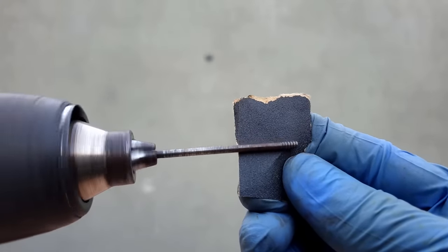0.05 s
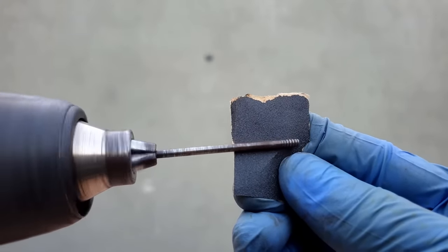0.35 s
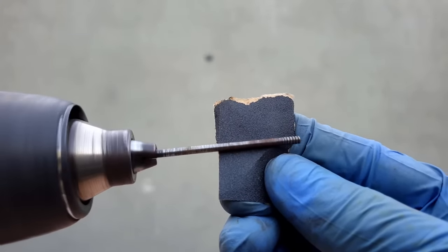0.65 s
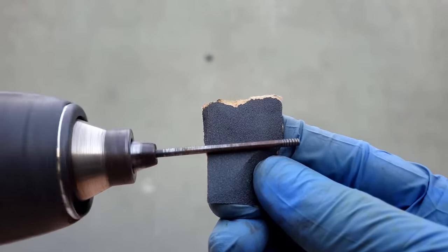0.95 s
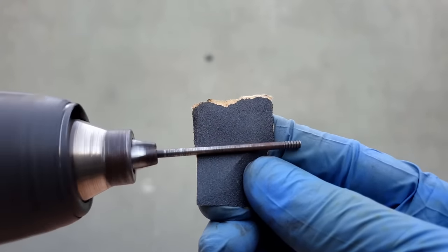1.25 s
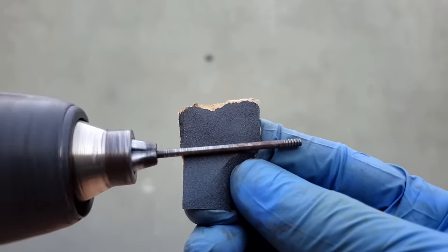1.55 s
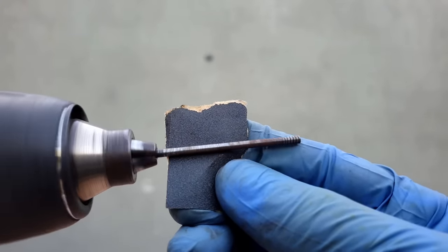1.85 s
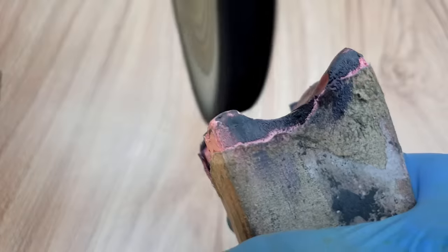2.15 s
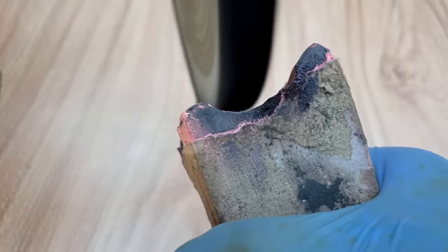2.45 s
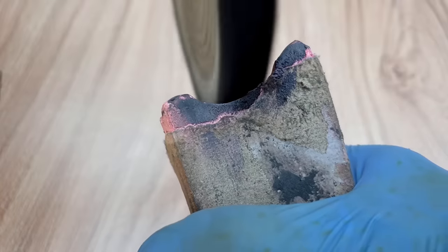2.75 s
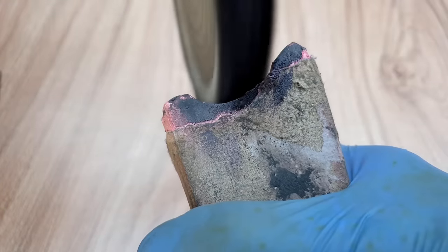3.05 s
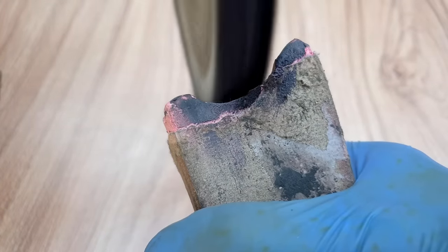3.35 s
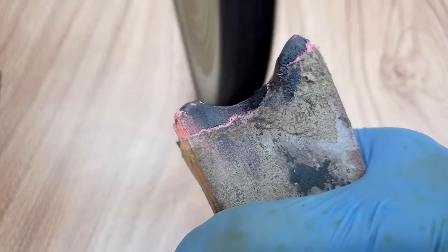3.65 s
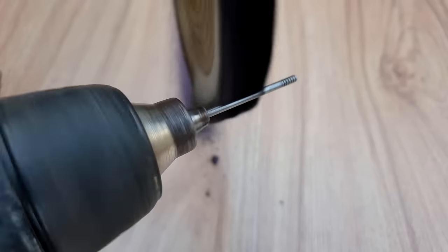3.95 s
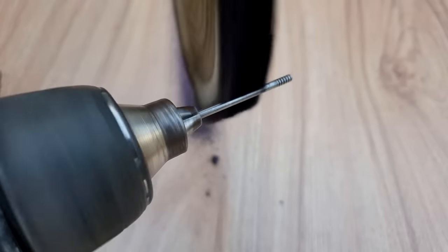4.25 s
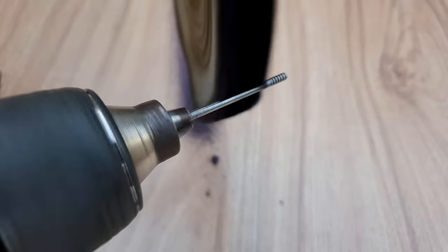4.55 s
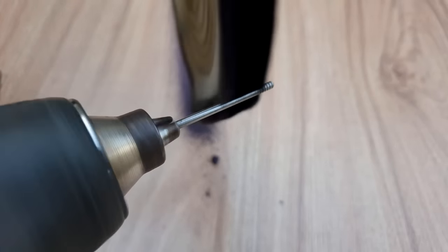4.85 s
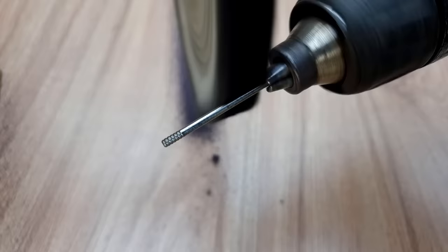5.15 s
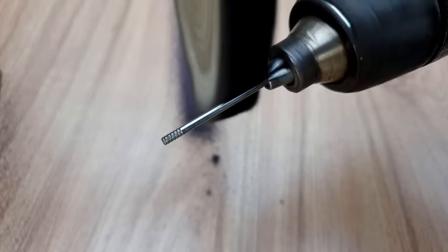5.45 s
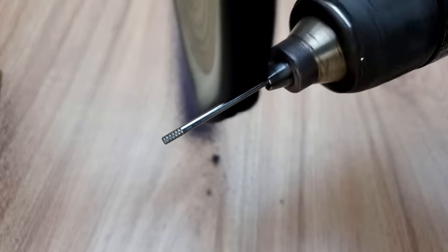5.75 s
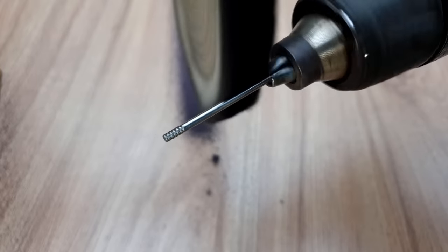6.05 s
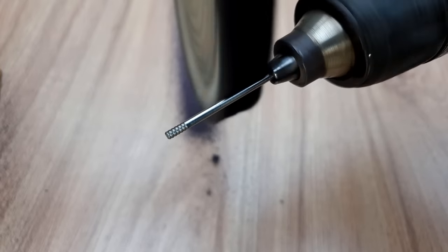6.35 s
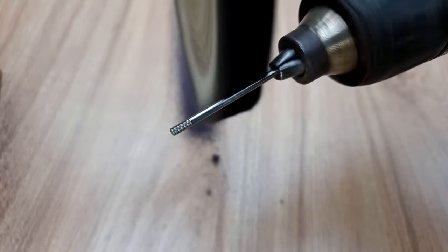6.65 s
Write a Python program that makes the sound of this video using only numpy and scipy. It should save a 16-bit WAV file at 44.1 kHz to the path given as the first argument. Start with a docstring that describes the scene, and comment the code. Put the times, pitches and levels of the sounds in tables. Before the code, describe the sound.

A whining drill spins a steel rod against sandpaper, a block rasps softly on an abrasive wheel, then the rod grinds with a loud hiss.

```python
"""Workshop, close up: four quick jobs. A whining drill spins a thin steel rod against sandpaper.
A block is eased onto a motor-driven abrasive wheel: it grazes, rasps, and ticks as a high spot
strikes it once a turn, among faint bird-like chirps. Then the rod hisses loudly on the wheel: first
its shank, with the drill whining, then its tip, fluttering. Grit excites each piece's resonances.
Motor hum and room noise lie underneath."""
import sys
import numpy as np
from scipy import signal
from scipy.fft import rfft, irfft, next_fast_len
from scipy.io import wavfile
from scipy.ndimage import uniform_filter1d

SR = 44100
rng = np.random.default_rng(int(sys.argv[2]) if len(sys.argv) > 2 else 0)


def persist_wave(psi):
    """Save psi, clipped to +-1, as 16-bit WAV."""
    counts = np.round(np.clip(psi, -1, 1) * 32767).astype(np.int16)
    wavfile.write(sys.argv[1], SR, np.atleast_2d(counts).T)


N = 295457
T = np.arange(N) / SR
FFT_SIZE = next_fast_len(N, True)
HZ = np.fft.rfftfreq(FFT_SIZE, 1 / SR)

# jobs (start [s], end [s])
SANDING_S, BLOCK_S, SHANK_S, TIP_S = (-.1, 2.157), (2.158, 3.74), (3.74, 5.209), (5.211, 6.8)
# (time [s], wheel speed [turns/s])
WHEEL_SPEED = [(2.2, 49.6), (2.8, 49.45), (3.3, 48.9), (3.9, 48.8), (4.8, 48.65), (5.15, 48.7), (5.4, 49.2),
               (6.2, 49.35)]
# drill whine (motor order, relative level [dB])
WHINE_SANDING = [(1, -20.5), (3, -20), (6, -18), (9, 2.5), (12, -16), (15, -1), (16, -13), (17, -15),
                 (22, -10), (23, -10), (24, -3), (25, -7.5), (26, -6.5), (27, -11), (29, -12), (30, -7),
                 (32, -15), (33, -12), (35, -8.5), (36, -14)]
WHINE_SHANK = [(1, -33), (3, -24), (9, 0), (12, -1.5), (15, -5.5), (16, -11), (17, -11), (24, -9), (25, -9),
               (27, -8), (29, -13), (32, -12), (35, -12)]
# contact spectra (frequency [Hz], relative density [dB])
COLOUR_SANDING = [(200, -35), (380, -19), (560, -52), (900, -30), (1020, -78), (1280, -24.5), (1920, -24),
                  (2140, -21.5), (2540, -8.5), (3400, -5.5), (3770, -9), (4100, -5), (5890, -5),
                  (6720, 1.5), (7860, -10), (10800, -4.5), (12300, -8.5), (16000, -10)]
COLOUR_BLOCK = [(350, -54), (600, -25), (881, -16), (957, -11.5), (1140, -10.5), (2150, -3), (2720, 2.5),
                (3120, -4.5), (3430, -1.5), (4460, -6), (4840, -5), (6120, 2), (6920, -12.5), (11300, -5),
                (16000, -11.5)]
COLOUR_SHANK = [(410, -42), (700, -38), (1500, -14.5), (1600, -12), (1850, -9), (2110, 1), (2730, -8),
                (3790, -9), (4150, -4.5), (5060, -6), (5690, -2.5), (6740, -3), (9110, -4), (15200, -2.5),
                (16000, -5)]
COLOUR_TIP = [(410, -77), (700, -39), (1540, -17), (2190, -2.5), (2660, -12.5), (2900, -4.5), (3250, -7),
              (3500, -1), (3940, -3.5), (5190, -2.5), (6150, -8), (6830, -1), (9600, -2.5), (12000, -0.5),
              (13500, -4), (14800, -0.5), (16000, -3)]
# resonances and notches of the held piece (frequency [Hz], width [Hz], gain [dB])
RINGS_SANDING = [(1183, 250, 15.5), (2230, 250, 9), (4650, 710, 1.5), (6800, 320, -3.5), (10200, 1100, -2)]
RINGS_BLOCK = [(1010, 210, 10), (2260, 65, 8), (2680, 80, -1), (2930, 200, -7), (3510, 130, 9),
               (4060, 110, 9), (4350, 190, 12.5), (4650, 150, -4.5), (5700, 58, 2), (6960, 440, 13)]
RINGS_BLOCK_TILTED = [(955, 75, -2), (1340, 160, 6), (1870, 120, 10), (2000, 110, -2), (2125, 60, 3),
                      (2500, 140, 0.5), (3190, 130, -7), (3520, 130, 4), (3734, 40, 4), (4140, 100, 6.5),
                      (4500, 110, 1), (5400, 280, 4), (7160, 820, 8.5)]
RINGS_SHANK = [(1623, 21, 15.5), (2150, 160, 2.2), (3530, 170, 12), (5030, 240, 3.8), (6740, 130, 6.4),
               (11300, 180, 2.1)]
RINGS_TIP = [(1880, 86, 5), (2200, 500, 3.5), (3550, 160, 6.5), (4730, 80, -2), (4840, 200, 4.5),
             (5400, 110, 3), (6080, 83, 11), (6760, 221.4, 2.5), (7500, 220, -4), (8080, 66.15, 8),
             (8570, 150, 2), (11800, 260, 1), (12050, 250, 8), (14400, 350, 6.5), (15000, 400, 6)]
# wheel-kicked modes (frequency [Hz], level [dB], peak position [turns], half length [s], glide [Hz/ms])
MODES_BLOCK = [(1006, -70.5, 0.8, 0.0027, -15), (1570, -67.5, .24, 0.004, 105), (2160, -66, .05, 0.002, 5),
               (4430, -63, .17, 0.0021, 30)]
MODES_SHANK = [(2102, -46, .05, 0.0046, -21), (3520, -52, 0.34, 0.0036, -31), (5020, -52.5, .47, 0.003, -3),
               (6940, -65, .3, .0018, 37)]
MODES_TIP = [(1970, -58.5, .62, 0.0027, 122), (2210, -56.5, .28, .0013, 0), (3496, -47.5, .21, .0036, -10),
             (5340, -53.5, .28, .0018, 60), (6740, -50.5, 0.343, 0.0023, -2), (7130, -51.5, .1, .0028, -55)]
# hand pressure on the paper (time [s], relative level [dB])
PRESS_SANDING = [(.02, -38.5), (.07, -42.5), (.11, -40), (.36, -40), (.4, -36.5), (.45, -40)]
# coarse grains snapping (time [s], treble boost [dB])
GRAIN_SNAPS = [(.262, 12), (.299, 10), (.388, 12)]
# pressure on the block (time [s], hiss level [dB])
PRESS_BLOCK = [(2.33, -80), (2.56, -61), (2.69, -54.5), (2.73, -50), (3.04, -48.5), (3.22, -44.5),
               (3.45, -49.5), (3.69, -51), (3.74, -44.5)]
# high spot catching the block (time [s], peak force [dB])
CATCHES = [(3.066, -30.5), (3.1476, -25.5), (3.228, -32), (3.297, -22)]
# struck block (frequency [Hz], relative level [dB])
TICK_MODES = [(5500, -0.5), (6350, 2), (10000, -2.5), (12800, -9)]
# edge scrapes (peak time [s], half length [s], frequency [Hz], glide [Hz/s], width [Hz], level [dB])
SCRAPES = [(2.254, .04, 3120, -1500, 450, -71), (2.387, 0.03, 3080, -6000, 300, -61.5),
           (2.412, 0.049, 2410, 0, 800, -62.5), (2.408, 0.041, 5440, -3000, 900, -59.5),
           (2.488, .055, 5430, 0, 220, -69), (2.555, 0.028, 4750, -3000, 900, -69),
           (2.63, .04, 5850, 2000, 600, -67), (2.637, 0.069, 2750, 3500, 400, -66),
           (2.756, 0.048, 2090, 600, 300, -56), (2.946, 0.14, 2750, -200, 110, -58),
           (2.99, .05, 2370, 0, 200, -56), (3.125, 0.049, 4320, -8000, 200, -53),
           (3.26, 0.081, 2370, 600, 450, -55.5), (3.65, .015, 4350, -17000, 300, -60)]
# (start [s], length [s], first pitch [Hz], last pitch [Hz], hoarseness [0-1], level [dB])
CHIRPS = [(2.148, 0.12, 2185, 1940, 0.06, -60.5), (2.155, .026, 3550, 2900, 0.1, -65),
          (2.305, 0.026, 3400, 2930, .03, -73), (2.432, .12, 2410, 2286, 0.05, -58.5)]
# wheel motor: light, under the block, under the rod (start [s], end [s], levels of 4 orders [dB])
MOTOR_HUM = [(2.16, 3.0, -79, -68.5, -81.5, -94), (3.017, 3.75, -88, -75, -73, -83.5),
             (3.738, 6.8, -96, -87.5, -85, -109)]
# background spectra (frequency [Hz], relative density [dB])
COLOUR_BENCH = [(30, -28), (60, 10), (140, 5), (250, 1.5), (500, -45), (1500, -52)]
COLOUR_ROOM = [(15, -12), (30, -4), (55, 1), (100, -2.5), (150, -2.5), (300, -4), (400, -5.5), (520, -2),
               (750, -6.5), (1100, -31), (2000, -16)]
# stereo width (frequency [Hz], side minus mid [dB])
WIDTH_SANDING = [(60, -2), (130, -4), (290, -28), (640, 12), (1410, 3), (3100, -3), (6820, -2), (15000, -4)]
WIDTH_BLOCK = [(60, -5), (130, -3.5), (290, -4), (640, -5), (1410, -0.5), (3100, 2), (6820, -4),
               (15000, -6.5)]
WIDTH_SHANK = [(400, -1), (1300, 11.5), (2050, -8.5), (2600, 4), (4000, 1), (6200, 1), (7300, -7),
               (8200, -64), (13000, -12), (16000, -34)]
WIDTH_TIP = [(400, -12), (1400, 2), (2200, -1), (3500, -1), (3950, 11), (4700, -3), (7300, -1), (7900, -15),
             (16000, -96)]
WIDTH_ROOM = [(30, -1), (120, -4), (300, -7.5), (600, -3)]
# (frequency [Hz], left minus right [dB])
BALANCE_SANDING = [(300, 3), (1300, 6.5), (2700, 5), (6500, 6.5), (9000, -1.5), (12500, 4.5), (15000, 10)]


def rod_shank(rub_db=-32.5, drill_db=-41, drill_hz=435.4):
    """The spinning rod meets the wheel close to the chuck and rings near 2 kHz."""
    force = wheel_grit(repeat_hz=3050, patchy_db=.5, repeat_share=.42) * amp(.8 * drift(38))
    rub = unit(shape(force, body(COLOUR_SHANK, RINGS_SHANK)))
    rub *= amp(rub_db + runout_db(once_db=.56, twice_db=-.7, offset_turns=.39))
    chatter = kicks(MODES_SHANK, SHANK_S, slip_rad=.5, uneven_db=2.2)
    whine = drill_whine(drill_speed(drill_hz), SHANK_S, WHINE_SHANK, jitter=.0008, flutter=.5, waver_db=.6)
    rod = stereo(rub + chatter, WIDTH_SHANK, left_db=.9, direct=.94)
    drill = stereo(amp(drill_db) * whine, WIDTH_SHANK, left_db=3.5)
    return (rod + drill) * during(SHANK_S)


def rod_tip(rub_db=-33, wobble_hz=6.35, settle_s=.01):
    """Near its free end the rod wobbles slowly and bounces with each wheel turn."""
    wobble_db = .13 * np.cos(2 * np.pi * wobble_hz * T) + .21 * drift(30)
    force = wheel_grit(repeat_hz=2779, patchy_db=.5, repeat_share=.51)
    force *= amp(wobble_db + runout_db(once_db=.06, twice_db=1.5, offset_turns=.35))
    landing_db = -4 * np.exp(-abs(T - TIP_S[0]) / settle_s)
    rub = unit(shape(force, body(COLOUR_TIP, RINGS_TIP))) * amp(rub_db + landing_db)
    chatter = kicks(MODES_TIP, TIP_S, slip_rad=.7, uneven_db=1.2)
    return stereo(rub + chatter, WIDTH_TIP, left_db=-.74) * during(TIP_S)


def sanding(rub_db=-41.5, drill_db=-40.5, drill_hz=432, snap_s=.0005, let_go_s=.017):
    """The rod rubs sandpaper, shaken by motor and chuck; the whine slowly grows."""
    speed_hz = drill_speed(drill_hz)
    angle = 2 * np.pi * np.cumsum(speed_hz) / SR
    motor_db = 1.4 * np.cos(angle) + .68 * np.cos(2 * angle)
    chuck_db = .6 * np.cos(angle / 19)
    grit_db = drift(520)
    force = rng.standard_normal((2, N)) * amp(motor_db + chuck_db + grit_db)
    rub = unit(shape(force, body(COLOUR_SANDING, RINGS_SANDING)))
    treble = shape(rub, 1 / (1 + (7500 / (HZ + 1)) ** 8))
    snap_db = sum(db * np.exp(-abs(T - at_s) / snap_s) for at_s, db in GRAIN_SNAPS)
    rub = (rub - treble) * amp(.5 * drift(40)) + treble * amp(1.2 * drift(28) + snap_db)
    press_db = curve(PRESS_SANDING) - np.mean(PRESS_SANDING, axis=0)[1]
    rub *= amp(rub_db + press_db)
    growth_db = 1.05 * np.minimum(T - SANDING_S[1], 0)
    whine = drill_whine(speed_hz, SANDING_S, WHINE_SANDING, jitter=.0007, flutter=.6, waver_db=.7)
    rod = stereo(rub, WIDTH_SANDING, left_db=spectrum_db(BALANCE_SANDING), direct=.9)
    drill = stereo(amp(drill_db + growth_db) * whine, WIDTH_SANDING, left_db=5.5)
    let_go_db = -9 * np.clip(1 + (T - SANDING_S[1]) / let_go_s, 0, 1)
    return (rod + drill) * amp(let_go_db) * during(SANDING_S, edge_samples=450)


def block(bite_db=-50.5, free_rasp_db=-70.5, full_rasp_db=-55, tilt_at_s=3.06, tilt_length_s=.13):
    """Pressure drives grit hiss and, as the wheel bites, a buzzing rasp; tilting shifts the resonances."""
    held_db = curve(PRESS_BLOCK)
    graze_db = -54.5 + swell_db(at_s=2.385, hold_s=.039, rise_db_per_s=380, fall_db_per_s=168)
    press_db = np.maximum(held_db, graze_db)
    seated = amp(3.7 * np.minimum(held_db - bite_db, 0))  # steep rise, capped at the bite
    tilt = np.clip(.5 + (T - tilt_at_s) / tilt_length_s, 0, 1)
    force = wheel_grit(repeat_hz=4760, patchy_db=1.5, repeat_share=.84)
    upright = shape(force, body(COLOUR_BLOCK, RINGS_BLOCK))
    tilted = shape(force, body(COLOUR_BLOCK, RINGS_BLOCK_TILTED))
    ringing = (1 - tilt) * upright + tilt * tilted
    light_touch = shape(force, amp(spectrum_db(COLOUR_BLOCK)))
    rub = seated * ringing + (1 - seated) * light_touch
    lowpass = 1 / (1 + (HZ / 3600) ** 6)
    rasp_gain = np.hypot(amp(free_rasp_db), amp(full_rasp_db) * seated)
    rasp = unit(shape(rub, lowpass)) * rasp_gain * amp(runout_db(once_db=-1, twice_db=0))
    buzz = kicks(MODES_BLOCK, BLOCK_S, slip_rad=.18, uneven_db=3) * seated * amp(-4 * tilt)
    hiss = unit(shape(rub, 1 - lowpass))
    treble = shape(hiss, 1 - 1 / (1 + (HZ / 7200) ** 8))
    dulling_db = .088 * np.minimum(press_db - bite_db, 0)  # a light touch is duller
    hiss += treble * (amp(dulling_db) - 1)
    hiss *= amp(press_db + runout_db(once_db=.5, twice_db=.5) + 1.03 * drift(25))
    out = stereo(rasp + buzz, WIDTH_BLOCK, left_db=-3.5) + stereo(hiss, WIDTH_BLOCK, left_db=4.5)
    return out * during(BLOCK_S)


def wheel_grit(repeat_hz, patchy_db, repeat_share):
    """Coarse rim bumps return each turn; fine grit cuts afresh, harder on some patches."""
    turns, rim_points = wheel_turns(), SR // 49
    bumps = np.array([around_rim(rim, turns) for rim in rng.standard_normal((2, rim_points))])
    fresh = rng.standard_normal((2, N))
    share = repeat_share / (1 + (HZ / repeat_hz) ** 2)
    force = shape(bumps, np.sqrt(share)) + shape(fresh, np.sqrt(1 - share))
    patches = uniform_filter1d(rng.standard_normal(rim_points), size=36, mode="wrap")
    patches -= uniform_filter1d(patches, size=300, mode="wrap")
    return force * amp(patchy_db * around_rim(unit(patches), turns))


def runout_db(once_db, twice_db, offset_turns=0):
    """An off-centre, out-of-round wheel presses harder once and twice a turn."""
    angle = 2 * np.pi * (wheel_turns() - offset_turns)
    return once_db * np.cos(angle) + twice_db * np.sin(2 * angle)


def kicks(modes, span_s, slip_rad, uneven_db, stray_s=.00027):
    """Once a turn each mode swells, glides and dies; strength, timing and phase stray."""
    gate = during(span_s)
    live = gate > .001
    turns, speed_hz = wheel_turns()[live], curve(WHEEL_SPEED)[live]
    out = np.zeros((2, N))
    for hz, db, peak_turns, half_s, glide_hz_per_ms in modes:
        turn, fraction = np.divmod(turns - peak_turns + .5, 1)
        t = (fraction - .5) / speed_hz
        size, phase, late = rng.standard_normal((400, 3))[turn.astype(int)].T
        envelope = np.exp(-((t - stray_s * late) / half_s) ** 2) * amp(uneven_db * size)
        angle = 2 * np.pi * (hz + .5 * glide_hz_per_ms * t * 1000) * t + slip_rad * phase
        out[:, live] += amp(db) * unit(envelope * np.array([np.cos(angle), np.sin(angle)]))
    return out * gate


def drill_whine(speed_hz, span_s, orders, jitter, flutter, waver_db):
    """Orders of the drill's motor; the high ones flutter most."""
    live = during(span_s, edge_samples=1000) > .001
    jittered_hz = speed_hz * (1 + jitter * drift(174))
    angle = 2 * np.pi * np.cumsum(jittered_hz[live]) / SR
    knots_s = np.linspace(0, T[-1], N // 500)
    tone = np.zeros(N, complex)
    for order, db in orders:
        depth = min(flutter * (order + 12) / 48, .7)
        waver = 1 + depth * np.interp(T[live], knots_s, rng.uniform(-1, 1, len(knots_s)))
        tone[live] += amp(db) * waver * np.exp(1j * (order * angle + 2 * np.pi * rng.random()))
    return np.array([tone.real, tone.imag]) / np.std(tone.real[live]) * amp(waver_db * drift(25))


def drill_speed(hz, hunt_hz=.462):
    """Steady motor speed that hunts slightly."""
    return hz + hunt_hz * drift(6.96)


def ticks(high_spot_s=3.2905, threshold_db=-34.5, rise_s=.00037, decay_s=.00055, lag_s=.00078):
    """A high spot catches the block, then rings its damped modes once a turn, ever more weakly."""
    out = np.zeros((2, N))
    hz, mode_db = np.transpose(TICK_MODES)
    turns = wheel_turns()
    passes = np.flatnonzero(np.diff(np.floor(turns - np.interp(high_spot_s, T, turns))))
    catches_db = [db + swell_db(at_s, 0, rise_db_per_s=450, fall_db_per_s=122) for at_s, db in CATCHES]
    force_db = np.max(catches_db, axis=0)
    for at, (detune, start_cycles) in zip(passes, rng.random((len(passes), 2, 2, len(hz), 1))):
        if force_db[at] > threshold_db:
            near = abs(T - T[at]) < .01
            t = T[near] - T[at] - lag_s
            cycles = hz[:, None] * (.97 + .07 * detune) * t + start_cycles
            ring = (amp(mode_db)[:, None] * np.sin(2 * np.pi * cycles)).sum(1)
            envelope = np.exp(np.minimum(t / rise_s, -t / decay_s))
            out[:, near] += amp(force_db[at]) * envelope * ring
    return stereo(out, WIDTH_BLOCK, left_db=2.5)


def edge_scrapes():
    """The block rocks; grit feeds fuzzy edge resonances that swell, glide and fade."""
    force = wheel_grit(repeat_hz=3500, patchy_db=2, repeat_share=.65)
    out = np.zeros((2, N))
    for at_s, half_s, hz, glide_hz_per_s, width_hz, db in SCRAPES:
        near = abs(T - at_s) < 3 * half_s
        t = T[near] - at_s
        # gliding band-pass: shift down, low-pass, shift back
        carrier = np.exp(2j * np.pi * (hz + .5 * glide_hz_per_s * t) * t)
        baseband = signal.lfilter(*signal.butter(2, width_hz / SR), force[:, near] / carrier)
        ring = (carrier * baseband).real
        out[:, near] += amp(db) * np.exp(-(t / half_s) ** 2) * unit(ring)
    return stereo(out, WIDTH_BLOCK, left_db=7) * during(BLOCK_S)


def chirps(steepness=5.5):
    """Thin, slightly hoarse whistles that hold, slide down and level off."""
    out = np.zeros((2, N))
    jitter = .3 * drift(420)
    for start_s, length_s, first_hz, last_hz, hoarseness, db in CHIRPS:
        progress = np.clip((T - start_s) / length_s, 0, 1)
        slide = .5 + .5 * np.tanh(steepness * (progress - .5))
        pitch_hz = (first_hz + (last_hz - first_hz) * slide) * (1 + hoarseness * jitter)
        angle = 2 * np.pi * np.cumsum(pitch_hz) / SR
        envelope = np.sqrt(2 * abs(np.sin(np.pi * progress)))
        out += amp(db) * envelope * np.array([np.cos(angle), np.sin(angle)])
    return stereo(out, WIDTH_BLOCK, left_db=6.5)


def motor_hum(orders=(1, 2, 4, 6), waver_db=2.5):
    """The wheel's motor hums at multiples of its speed."""
    angle = 2 * np.pi * wheel_turns()
    gains = sum(amp(row[2:])[:, None] * during(row[:2], edge_samples=1200) for row in MOTOR_HUM)
    return sum(gain * amp(waver_db * drift(7.8)) * np.sqrt(2) * np.sin(order * angle)
               for order, gain in zip(orders, gains))


def room(air_db=-71.5, bench_db=-74.5):
    """Low, wavering room noise; the bench rumbles under the block."""
    air = noise(COLOUR_ROOM) * amp(air_db + 2.5 * drift(17))
    rumble = noise(COLOUR_BENCH) * amp(bench_db) * during(BLOCK_S)
    return stereo(air + rumble, WIDTH_ROOM, left_db=-1.5)


def wheel_turns():
    """Turns made so far."""
    return np.cumsum(curve(WHEEL_SPEED)) / SR


def around_rim(profile, turns):
    """A rim pattern as it passes the contact."""
    return np.interp(turns % 1 * len(profile), np.arange(len(profile)), profile)


def body(colour, rings):
    """Gain of a contact spectrum plus the piece's resonances."""
    rings_db = sum(db / (1 + (2 * (HZ - hz) / width_hz) ** 2) for hz, width_hz, db in rings)
    return amp(spectrum_db(colour) + rings_db)


def stereo(pair, width, left_db, direct=0, lead_s=.00043):
    """Mid/side to left/right; direct sound reaches the left first, the rest is diffuse."""
    mid, side_gain = pair[0], amp(spectrum_db(width))
    side = shape(pair[1], side_gain)
    if direct:
        lead = direct * np.sin(2 * np.pi * HZ * lead_s)
        side = shape(side, np.sqrt(1 - lead ** 2)) + shape(mid, 1j * lead * side_gain)
    channels = np.array([mid + side, mid - side])
    balance = amp(np.array([[1], [-1]]) * left_db / 2)
    return shape(channels, balance) if np.ndim(left_db) else channels * balance


def swell_db(at_s, hold_s, rise_db_per_s, fall_db_per_s):
    """Attack, hold at 0 dB, release."""
    return -rise_db_per_s * np.maximum(at_s - T, 0) - fall_db_per_s * np.maximum(T - at_s - hold_s, 0)


def during(span_s, edge_samples=100):
    """Gate with linear edges."""
    return uniform_filter1d(((T >= span_s[0]) & (T < span_s[1])) * 1., size=edge_samples)


def noise(colour):
    """Coloured noise pair, rms 1."""
    return unit(shape(rng.standard_normal((2, N)), amp(spectrum_db(colour))))


def drift(rate_hz):
    """Random wander, rms 1."""
    return unit(shape(rng.standard_normal(N), np.exp(-(HZ / rate_hz) ** 2)))


def shape(x, gain):
    """Filter by a gain per frequency bin."""
    return irfft(rfft(x, FFT_SIZE) * gain, FFT_SIZE)[..., :N]


def spectrum_db(table):
    """Spectrum table at every bin, interpolated in log frequency."""
    hz, db = np.transpose(table)
    return np.interp(np.log(HZ + 1), np.log(hz + 1), db)


def curve(table):
    """Time table at every sample."""
    return np.interp(T, *np.transpose(table))


def unit(x):
    """Scale to rms 1."""
    return x / np.sqrt(np.mean(x ** 2) + 1e-20)


def amp(db):
    """dB to gain."""
    return 10 ** (np.asarray(db) / 20)


def scene():
    """Four jobs in one room."""
    foreground = sanding() + block() + edge_scrapes() + ticks() + chirps() + rod_shank() + rod_tip()
    return foreground + room() + motor_hum()


def record(dry):
    """Low-pass at 15.9 kHz."""
    taps = signal.firwin(511, 15900, window=("kaiser", 9), fs=SR)
    return signal.oaconvolve(dry, taps[None], "same")


dry = scene()
out = record(dry)
persist_wave(out)
```